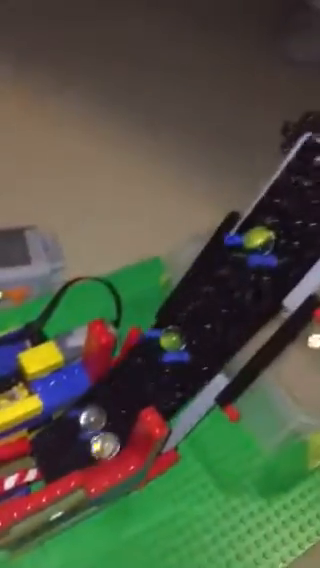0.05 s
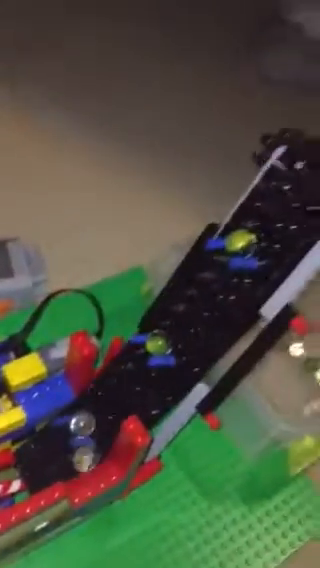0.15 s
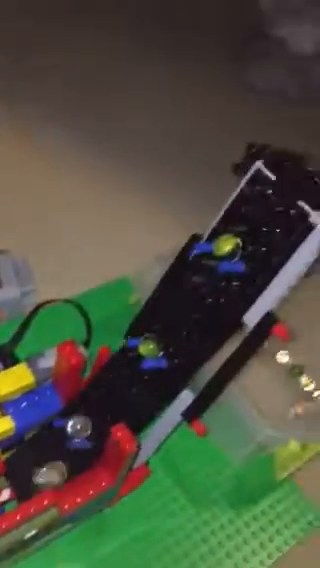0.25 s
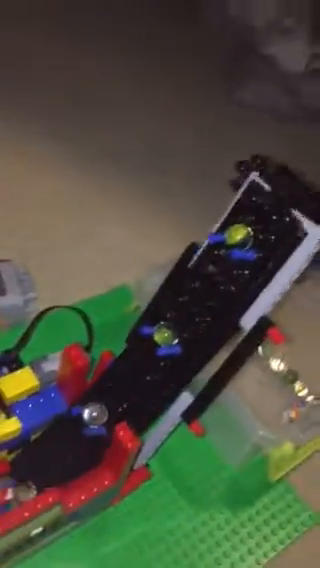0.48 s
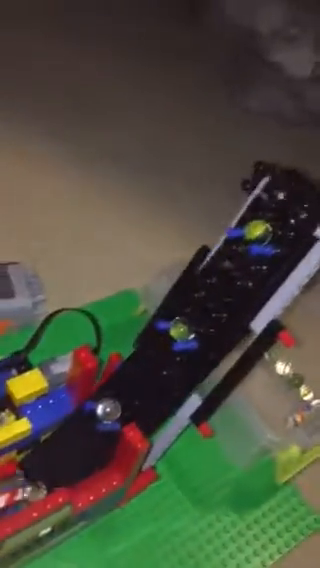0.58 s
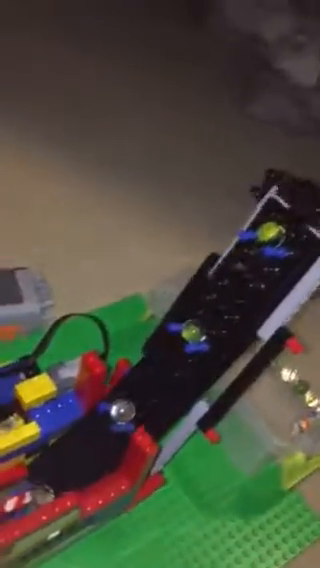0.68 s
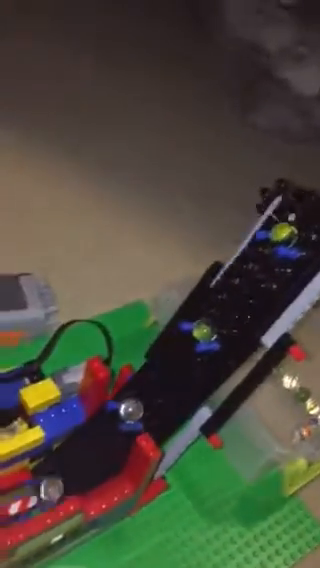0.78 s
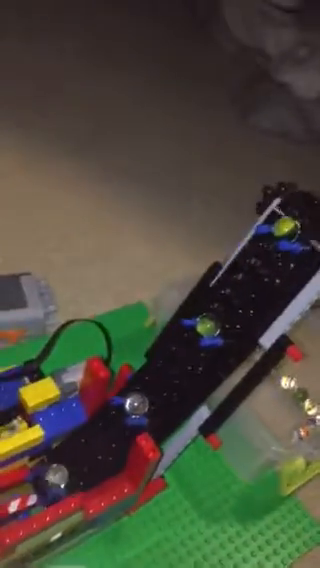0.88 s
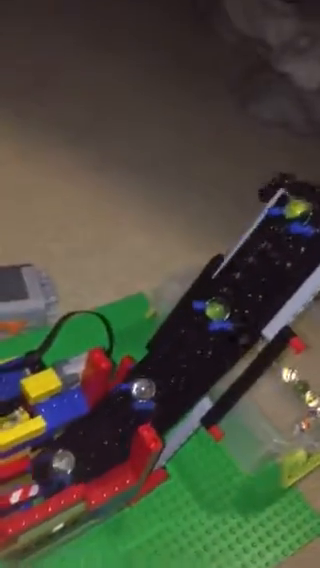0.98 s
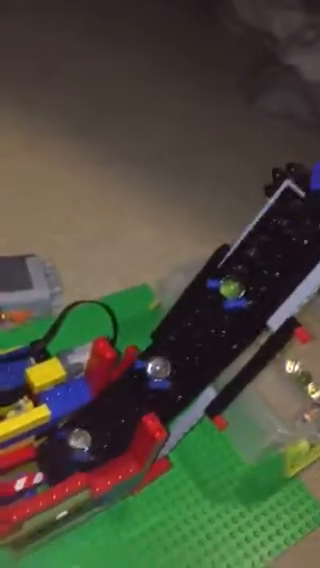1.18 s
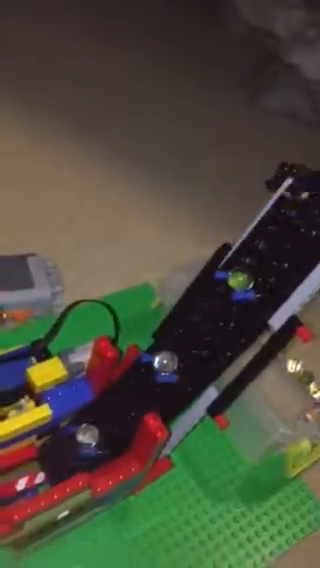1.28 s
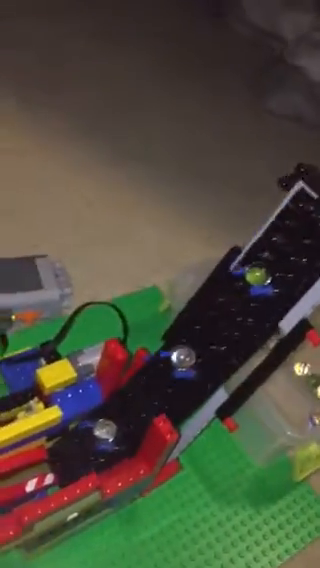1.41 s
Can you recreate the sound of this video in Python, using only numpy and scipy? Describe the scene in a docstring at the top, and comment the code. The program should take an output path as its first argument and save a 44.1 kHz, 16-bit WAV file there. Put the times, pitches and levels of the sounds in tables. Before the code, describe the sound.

Marbles click and knock in a small motorized plastic lift, its gears whirring steadily.

```python
"""A toy marble lift of plastic bricks runs close to the microphone in a small room.
From the start its geared motor whirrs and its belt links rattle. At 0.2 s a marble drops on the
frame, exciting its modes in a loud knock that overloads the microphone, and bounces. From 0.3 to
0.7 s glass marbles click against each other. A marble rolls briefly over the bricks near 0.7 s
and again near 1.4 s, among lighter knocks, while the motor runs on."""
import sys
import numpy as np
from scipy import signal
from scipy.fft import rfft, irfft
from scipy.io import wavfile
from scipy.ndimage import uniform_filter1d

SR = 44100
rng = np.random.default_rng(int(sys.argv[2]) if len(sys.argv) > 2 else 0)


def wav_out(sig):
    """Save sig, one row per channel (or a flat mono array), as 16-bit PCM at SR to the path in sys.argv[1]."""
    wavfile.write(sys.argv[1], SR, np.round(np.clip(np.atleast_2d(sig).T, -1, 1) * 32767).astype(np.int16))


N = 63945


def undb(db):
    """Amplitude ratio of a level in decibels."""
    return 10 ** (np.asarray(db) / 20)


def level(x, db):
    """Normalisation to a given rms level."""
    return x * undb(db) / np.sqrt(np.mean(x ** 2))


def fade(t, t60_s):
    """Exponential damping: the level falls 60 dB in t60_s."""
    return np.exp(-np.log(1000) * t / t60_s)


def add(out, start_s, sound):
    """Superposition: a sound joins the mix at its start time."""
    i = int(start_s * SR)
    out[i:i + len(sound)] += sound[:len(out) - i]


def colour(x, spectrum):
    """Minimum-phase filtering through (Hz, dB) points, scaled to keep the power of white noise."""
    size = 2048
    hz, db = np.array(spectrum, float).T
    bin_hz = np.arange(size // 2 + 1) * SR / size
    gain = undb(np.interp(np.log(bin_hz + 1), np.log(hz), db))
    cepstrum = irfft(np.log(level(gain, 0)))
    cepstrum[1:size // 2] *= 2  # folding the cepstrum makes the filter causal
    cepstrum[size // 2 + 1:] = 0
    return signal.fftconvolve(x, irfft(np.exp(rfft(cepstrum))))[:len(x)]


def drift(rate_hz):
    """Low-pass noise: random steps, smoothed twice and scaled to unit rms."""
    hold = int(SR / rate_hz)
    steps = np.repeat(rng.standard_normal(N // hold + 1), hold)
    return level(uniform_filter1d(uniform_filter1d(steps, hold), hold)[:N], 0)


# Frequency response of the room: frequency_hz, relative_db
ROOM_SPECTRUM = [(60, -30), (200, -2), (340, 2), (560, -5.5), (850, 0), (1250, 2.5), (1700, 1.5),
                 (4000, 0.5), (6500, 0), (9000, -6), (15000, -4)]
def room(x):
    """Reverberation by convolution: early reflections off the floor and toy, then a diffuse tail."""
    t = np.arange(SR // 2) / SR
    first_echo_s, early_db = 0.0022, 2
    early = rng.standard_normal(len(t)) * fade(t, t60_s=0.06) * (t > first_echo_s)
    late = rng.standard_normal(len(t)) * fade(t, t60_s=0.16) * (t > first_echo_s)
    response = undb(early_db) * early / np.linalg.norm(early) + late / np.linalg.norm(late)
    return signal.fftconvolve(x, colour(response, ROOM_SPECTRUM))[:N]


# Noise spectrum of the motor and gears: frequency_hz, relative_db
WHIRR_SPECTRUM = [(30, -23), (90, -23.5), (170, -16), (240, -12.5), (300, -1.5), (370, -8.5), (440, -8.5),
                  (560, -5), (800, -7), (1030, 0), (1270, 0.5), (1600, -3), (2100, -8.5), (2520, -8.5),
                  (3200, -13), (4100, -9.5), (5600, -18.5), (7000, -13), (8000, -21), (9400, -15),
                  (10800, -20.5), (12200, -12), (13200, -24), (15500, -20)]
# Tones of the gears, ahead of the motor's gain: pitch_hz, level_db
GEAR_PARTIALS = [(437, -53), (1222, -50), (1296, -51), (2500, -55.5)]
# Gain of the whole motor over time: time_s, gain_db
MOTOR_GAIN = [(0, 2.5), (.17, 1.5), (.29, -1.5), (.55, 0), (0.852, -.5), (1.1, -0.5), (1.27, 0), (1.45, 0)]
def motor():
    """Gear noise: a broadband whirr, shot noise from teeth and belt links, and faint wavering tones."""
    impacts_per_s, spread_db, pitch_wander = 2300, 1.5, 0.01133
    whirr = level(colour(rng.standard_normal(N), WHIRR_SPECTRUM), db=-38)
    strengths = undb(spread_db * rng.exponential(size=N)) * rng.choice([-1, 1], N)
    impacts = strengths * (rng.random(N) < impacts_per_s / SR)
    rattle = level(colour(impacts, WHIRR_SPECTRUM), db=-44)
    gear_time = np.cumsum(1 + pitch_wander * drift(rate_hz=25)) / SR
    tones = np.zeros(N)
    for pitch_hz, level_db in GEAR_PARTIALS:
        flutter = undb(2 * drift(rate_hz=39.8))
        tones += level(np.sin(2 * np.pi * pitch_hz * gear_time) * flutter, level_db)
    gain_db = np.interp(np.arange(N) / SR, *np.array(MOTOR_GAIN).T)
    return (whirr + rattle + tones) * undb(gain_db)


# A marble's runs over the bricks: start_s, length_s, crest_level_db
MARBLE_ROLLS = [(0.67, 0.099, -35.5), (1.312, 0.15, -35.5)]
# Spectrum of the rolling contact: frequency_hz, relative_db
ROLL_SPECTRUM = [(60, -62), (300, -21), (900, 4), (1700, 8), (2300, -3), (4200, -6), (7000, -16),
                 (15000, -11)]
def rolling_marble():
    """Rolling contact noise: an uneven, light rumble on the bricks swells and dies away."""
    out = np.zeros(N)
    for start_s, length_s, crest_level_db in MARBLE_ROLLS:
        contact = rng.standard_normal(N) * undb(4.6 * drift(rate_hz=257))
        rumble = level(colour(contact, ROLL_SPECTRUM), crest_level_db)
        swell = np.hanning(int(length_s * SR))
        add(out, start_s, rumble[:len(swell)] * swell)
    return out


# Collisions of glass on glass: start_s, ring_db, pitch_hz, snap_db
GLASS_COLLISIONS = [(.3285, -35, 9000, -36), (0.3568, -16.5, 12000, -30), (.4925, -25, 8500, -34),
                    (0.5868, -26, 6440, -20.5), (.5922, -38, 7460, -25), (.5955, -20, 7350, -32),
                    (0.603, -22, 5500, -39), (.6454, -19, 8500, -21.5), (.6562, -17, 9500, -25),
                    (0.6604, -22, 8500, -32), (0.6586, -12, 8400, -34), (0.662, -24, 7300, -34),
                    (0.6811, -11.5, 7400, -18.5), (0.691, -15, 8800, -30), (0.6941, -10, 5340, -16),
                    (0.698, -51, 7500, -29), (0.7017, -20, 5000, -23), (0.7055, -25, 6500, -29),
                    (0.71, -20, 8000, -30)]
# Spectrum of a collision's snap: frequency_hz, relative_db
SNAP_SPECTRUM = [(100, -16), (1500, -9), (2800, 1), (6000, -1.5), (10000, 2), (15500, -5)]
def glass_clicks():
    """Hard-body impact: brief contact radiates a few very high cycles and a broadband snap."""
    out, t = np.zeros(N), np.arange(SR // 50) / SR
    rise_s = 0.0001
    pulse = t / rise_s * np.exp(1 - t / rise_s)
    for start_s, ring_db, pitch_hz, snap_db in GLASS_COLLISIONS:
        ring = pulse * np.sin(2 * np.pi * pitch_hz * t)
        snap = colour(rng.standard_normal(len(t)) * fade(t, t60_s=0.005), SNAP_SPECTRUM)
        add(out, start_s, undb(ring_db) * ring + undb(snap_db) * snap)
    return out


def struck_mode(t, pitch_hz, t60_s):
    """Damped oscillation: a struck mode builds up and decays, radiating by its surface velocity."""
    omega = 2 * np.pi * pitch_hz
    build_up = 1 - np.exp(-t * pitch_hz)  # time constant of one cycle, so the bass comes late
    displacement = np.sin(omega * t) * fade(t, t60_s) * build_up
    return np.gradient(displacement, t, axis=-1) / omega


# Spectrum of a marble's contact with plastic: frequency_hz, relative_db
CRACK_SPECTRUM = [(40, -28), (200, -12.5), (1000, -0.5), (2600, 2.5), (4200, -2), (6000, -3), (8500, -3),
                  (11000, -9), (15500, -1.5)]
def contact_crack(t, crack_db):
    """Contact transient: a tick and a noise burst, brighter for harder blows; loose bricks buzz on."""
    buzz_db, tick_db, corner_hz_per_db = -23, 10.5, 128
    envelope = fade(t, t60_s=0.006) + undb(buzz_db) * fade(t, t60_s=0.12)
    burst = rng.standard_normal(len(t)) * envelope
    burst[0] += undb(tick_db)  # first instant of contact
    corner_hz = np.clip(9100 + corner_hz_per_db * crack_db, SR / 20, SR / 3)
    softened = signal.lfilter(*signal.butter(1, corner_hz, fs=SR), burst)
    return undb(crack_db) * colour(softened, CRACK_SPECTRUM)


# Normal modes of the brick frame: pitch_hz, relative_db, t60_s
FRAME_MODES = [(257, -24, 0.028), (313.3, -15.5, .055), (364, -7, 0.041), (425, -17.5, 0.055),
               (727, -7, 0.013), (772, -15, 0.033), (834, -4, 0.032), (927, -6.5, 0.033), (1054, 0, 0.011),
               (1263, -17.5, 0.0097), (1450, -22, 0.0096), (1535, -5, .015), (1680, -17, .012),
               (1750, -4.5, 0.013), (2424, -8.5, 0.0088)]
# Blows of a marble on plastic:
# start_s, ring_db, bass_db, bright_db, crack_db, pitch_ratio, brick_hz, brick_db
MARBLE_BLOWS = [(0.0121, -26, -5.5, -6, -32, 1.015, 3060, -37), (.2005, 5, 2, -8.5, 2.5, 1.0, 3570, -3),
                (0.2088, -17, -14, -6, -25, 1.04, 5450, -14), (.3063, -13.5, 0, 4.5, -16, 0.94, 3930, -17),
                (.3575, -12.5, -11, 5, -18, 1.066, 3030, -15),
                (.3782, -21.5, -6, -13, -29, 0.87, 3000, -41),
                (.3978, -10, -1.5, 4.5, -12.5, 1.024, 3940, -11.5),
                (.4032, -27, -22, -12, -43, 0.83, 2510, -28), (.4264, -20.5, -21, -6, -19, 2, 3350, -28),
                (.4279, -15, 3, 2, -25, 1.06, 5100, -23), (.5138, -23, -1.5, 4, -22, 0.97, 3600, -30),
                (.5830, -33, -24, 6, -36, 1.14, 2600, -35), (0.7179, -23.5, -2, -14, -31, 1.2, 3450, -34),
                (.7293, -21.5, -27, -2, -38, 0.89, 3260, -22.5),
                (.7772, -22, -24, -5, -33, 1.03, 2580, -33), (.8200, -29.5, -10, 3, -41, 1.3, 2600, -38),
                (.8310, -26.5, 1.5, -3, -32, 1.05, 3000, -45), (1.0290, -26, -1, 1, -26, 0.905, 2650, -32),
                (1.069, -35, 5, 4, -28, 0.84, 3980, -36), (1.125, -27.5, -1, 7.5, -40, 0.73, 3940, -40),
                (1.3762, -32, 5.5, 1, -33.5, 0.81, 3980, -44), (1.3838, -19, -8, 2, -21, 1.084, 3980, -24),
                (1.3922, -38, -2, 7, -48, 1.1, 3800, -26)]
def plastic_knocks():
    """Impulse excitation: each blow cracks and sets the frame's modes and the struck brick ringing."""
    out, t = np.zeros(N), np.arange(SR // 5) / SR
    mode_hz, mode_db, t60_s = np.array(FRAME_MODES).T
    hinges_hz = [457, 810, 1540]  # bass of the base plate, middle, brightness
    for start_s, ring_db, bass_db, bright_db, crack_db, pitch_ratio, brick_hz, brick_db in MARBLE_BLOWS:
        tilt_db = np.interp(np.log(mode_hz), np.log(hinges_hz), [bass_db, 0, bright_db])
        modes = struck_mode(t, pitch_ratio * mode_hz[:, None], t60_s[:, None])
        frame = undb(ring_db + mode_db + tilt_db) @ modes
        brick = undb(brick_db) * struck_mode(t, brick_hz, t60_s=0.0075)
        add(out, start_s, frame + brick + contact_crack(t, crack_db))
    return out


def scene():
    """Superposition: knocks and clicks with their reverberation, over the motor and rolling marble."""
    plastic, glass = plastic_knocks(), glass_clicks()
    reverberation = room(undb(-16.5) * plastic + undb(-14) * glass)
    return (plastic + glass + reverberation + motor() + rolling_marble())[None]


def record(dry):
    """Saturation and band limiting: the microphone overloads on the loudest knock; the top is cut."""
    ceiling = 0.77 * (1 + 0.051 * np.sign(dry))  # one polarity overloads sooner
    saturated = dry / (1 + (dry / ceiling) ** 6) ** (1 / 6)
    cutoff_hz = 15900
    return signal.sosfilt(signal.ellip(10, 0.2, 80, cutoff_hz, fs=SR, output="sos"), saturated)


dry = scene()
out = record(dry)
wav_out(out)
```